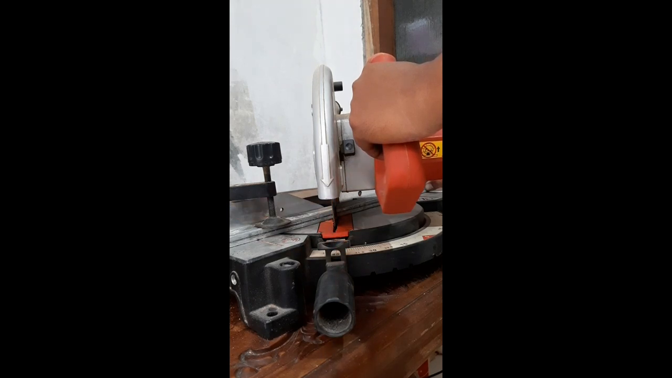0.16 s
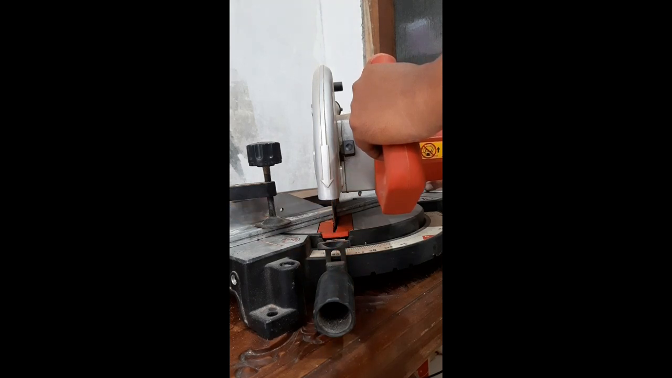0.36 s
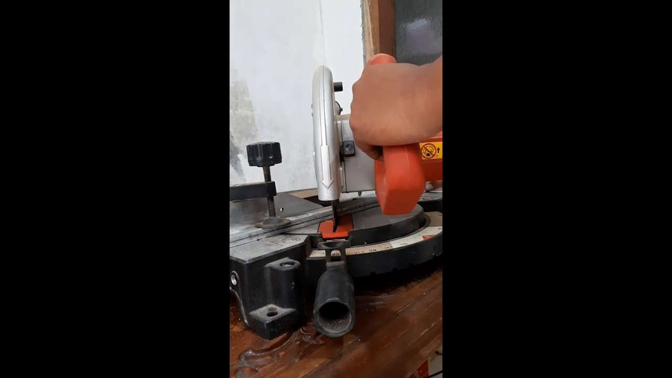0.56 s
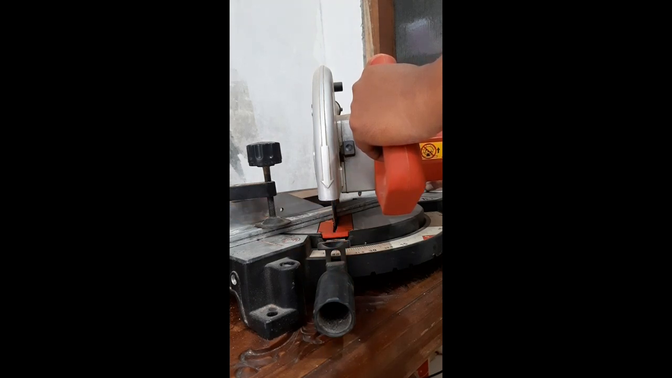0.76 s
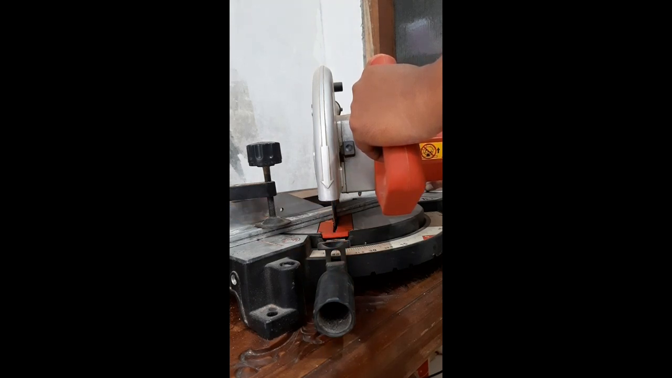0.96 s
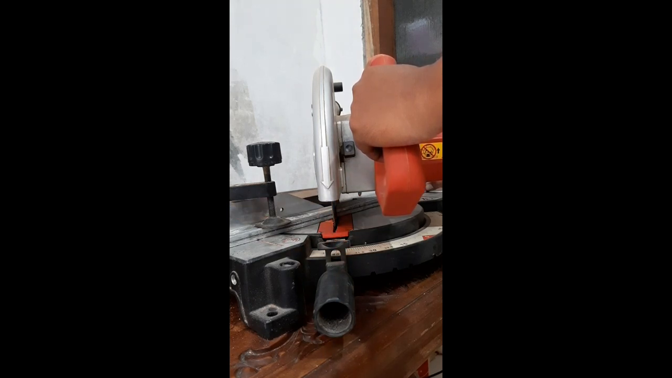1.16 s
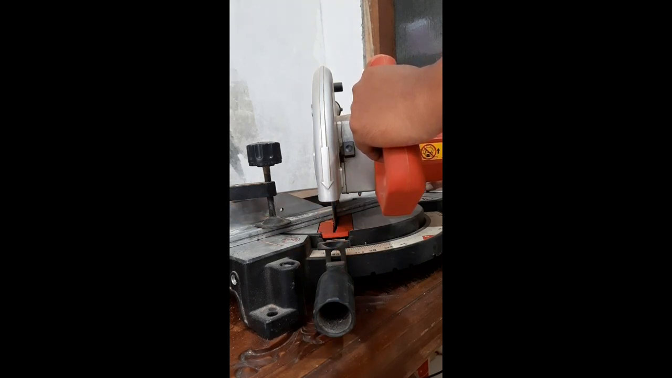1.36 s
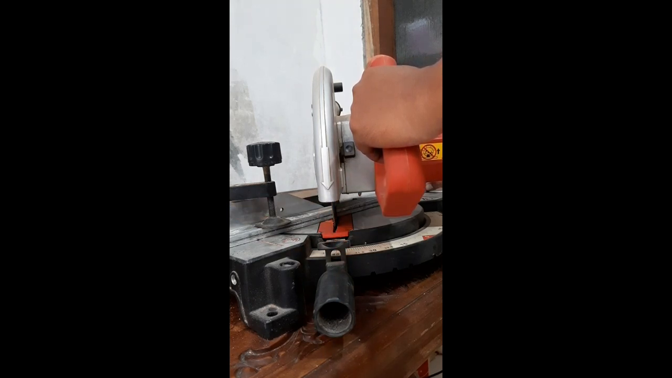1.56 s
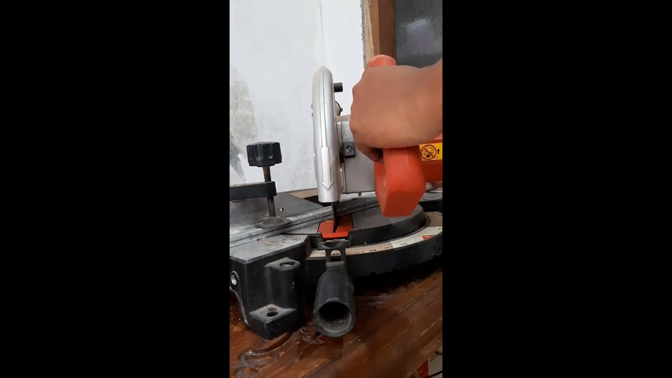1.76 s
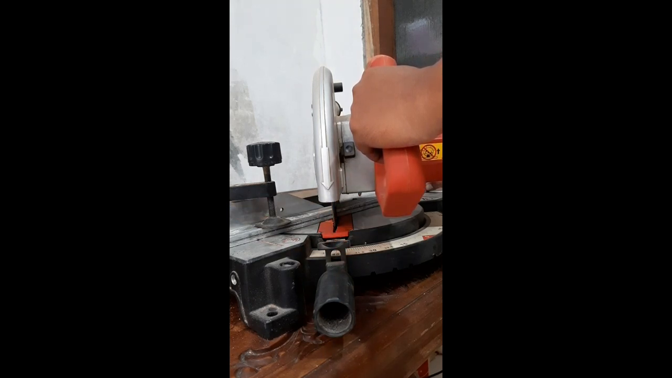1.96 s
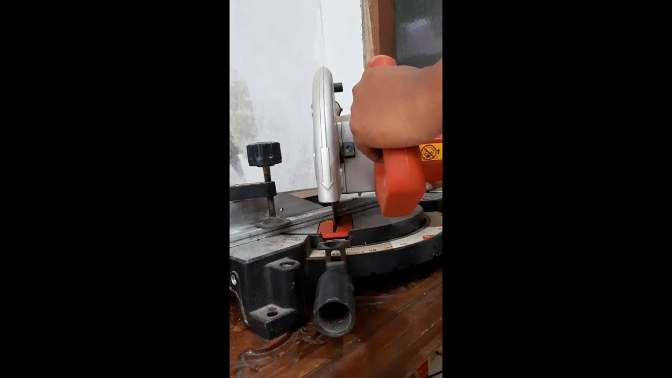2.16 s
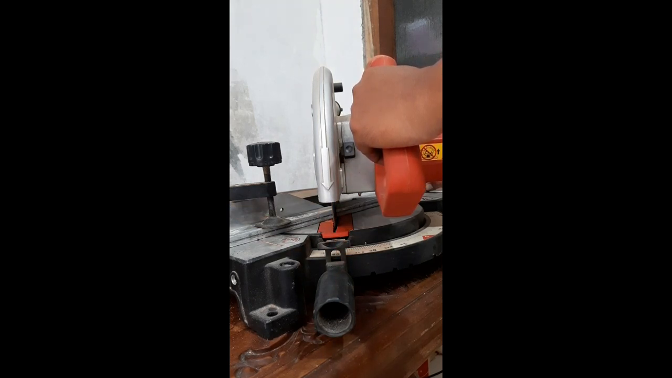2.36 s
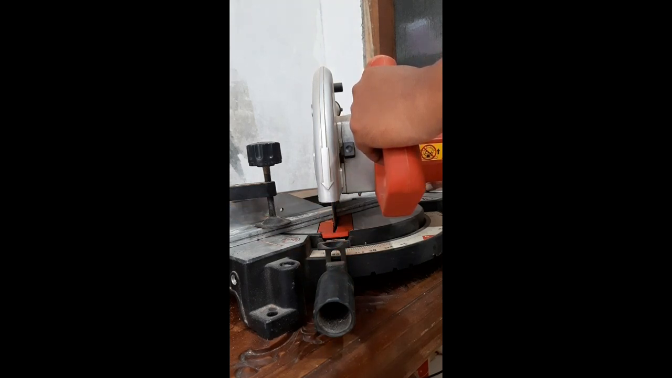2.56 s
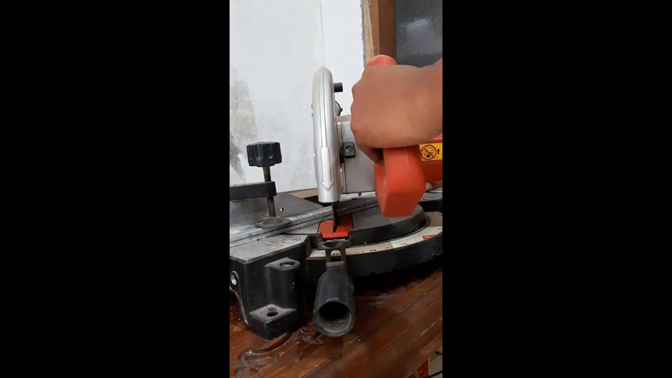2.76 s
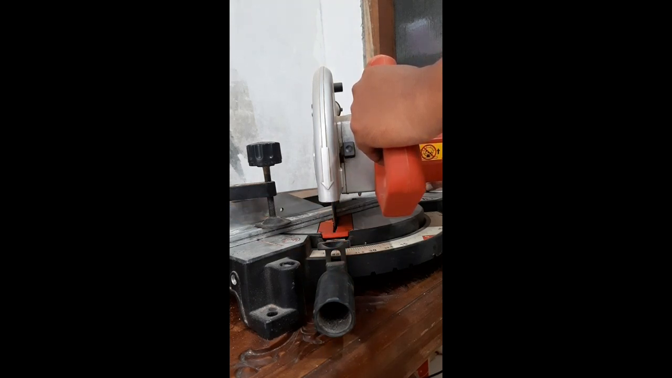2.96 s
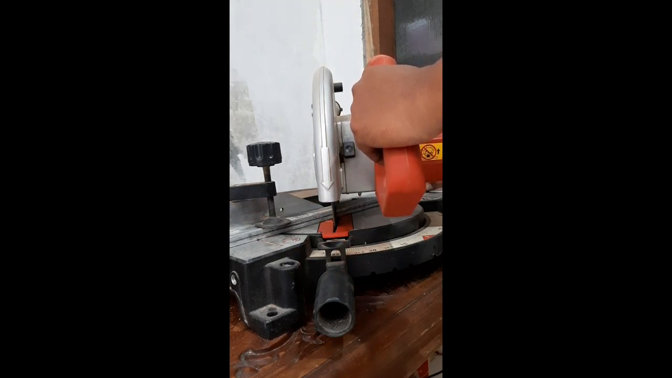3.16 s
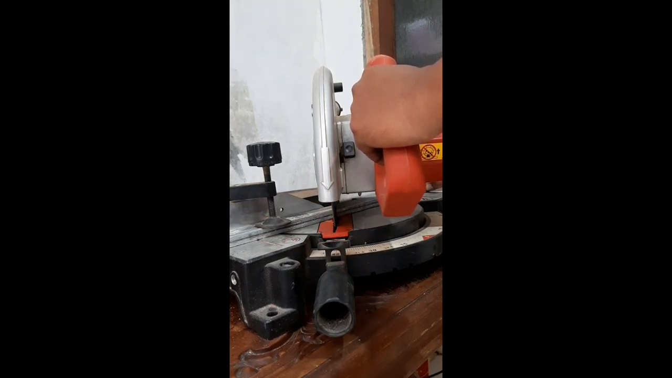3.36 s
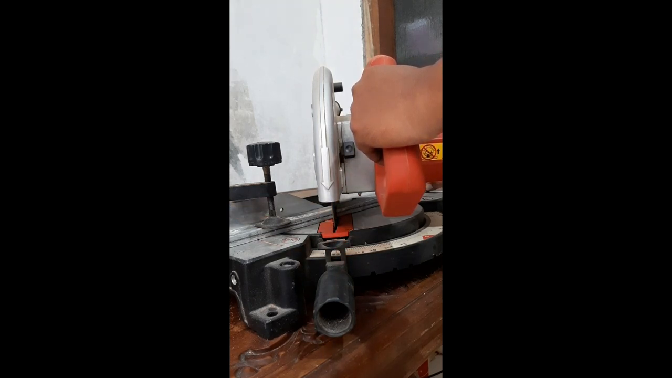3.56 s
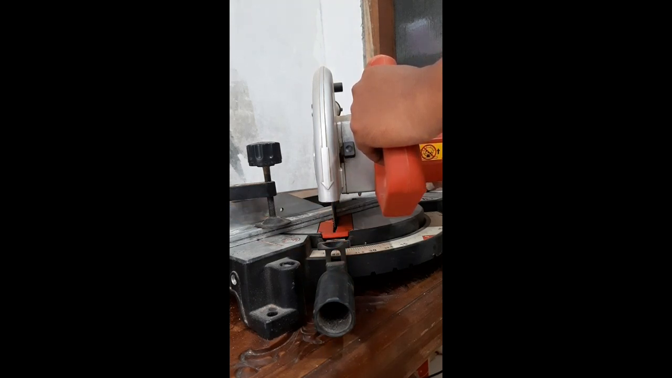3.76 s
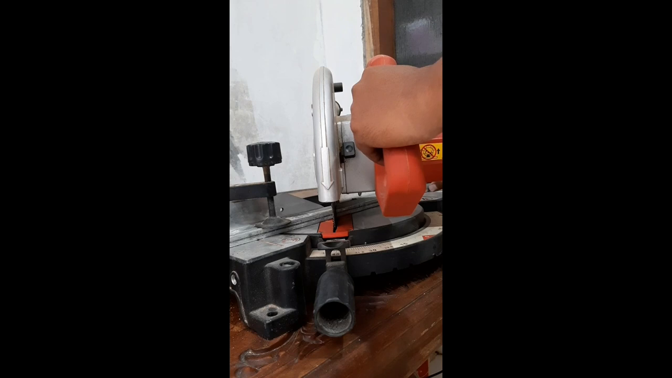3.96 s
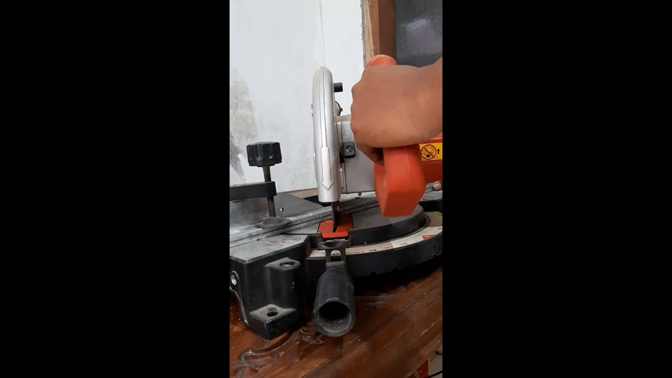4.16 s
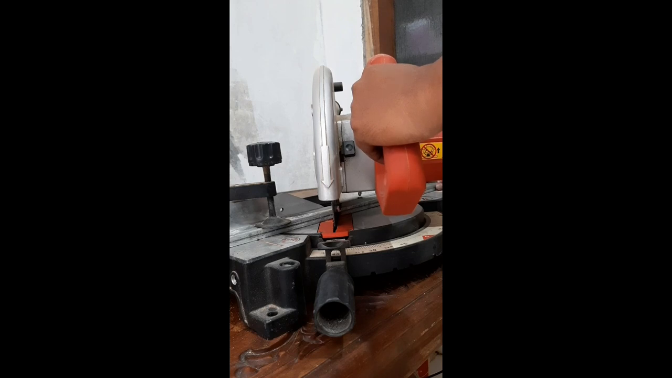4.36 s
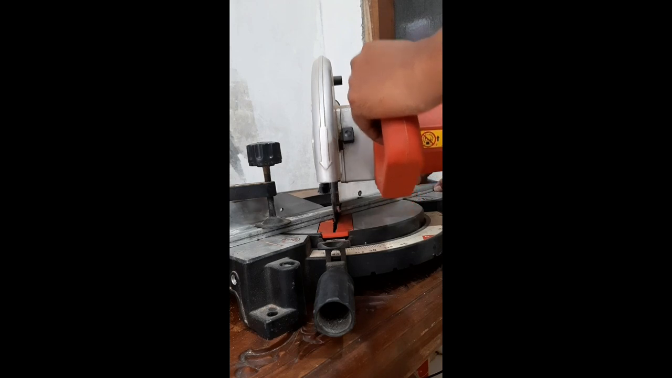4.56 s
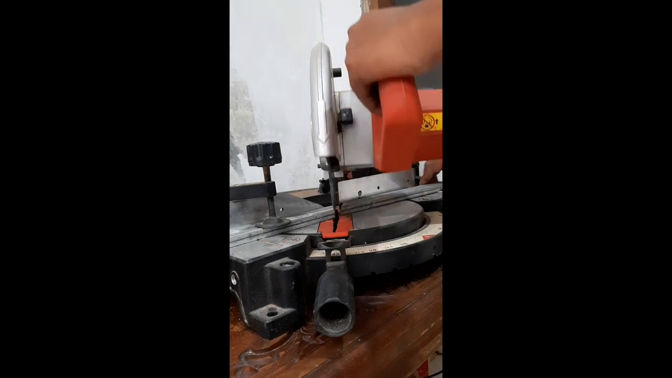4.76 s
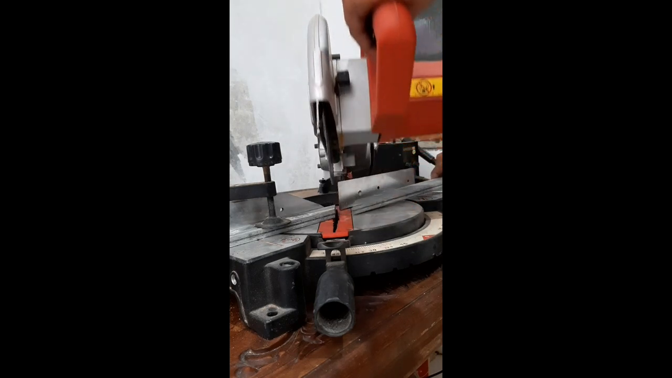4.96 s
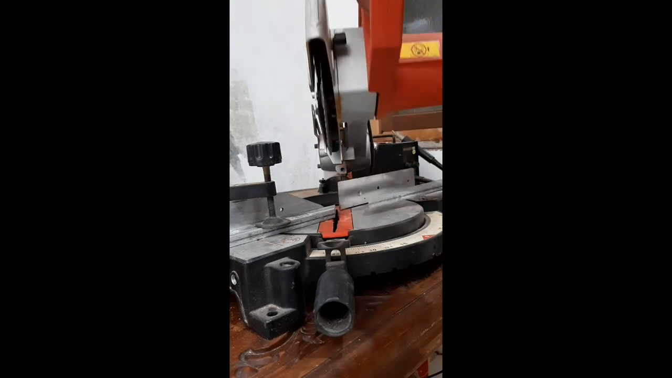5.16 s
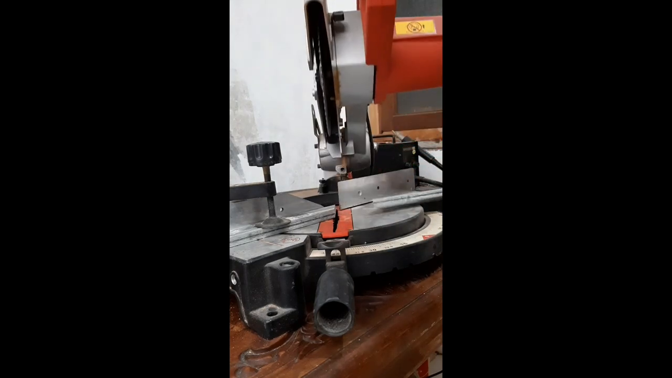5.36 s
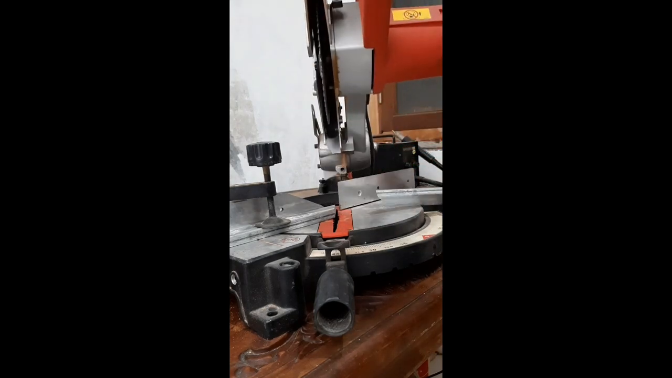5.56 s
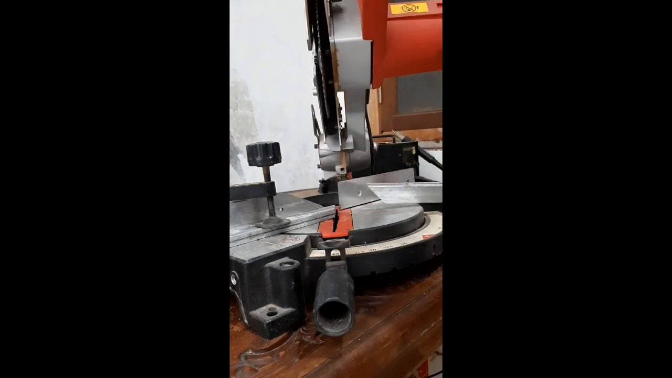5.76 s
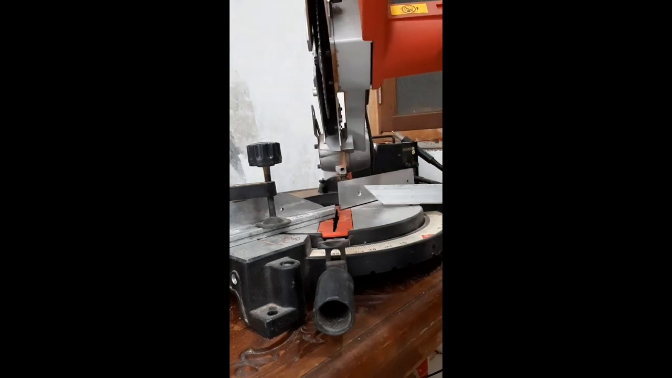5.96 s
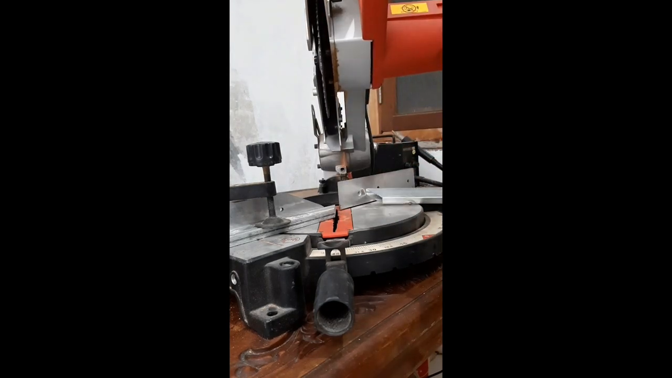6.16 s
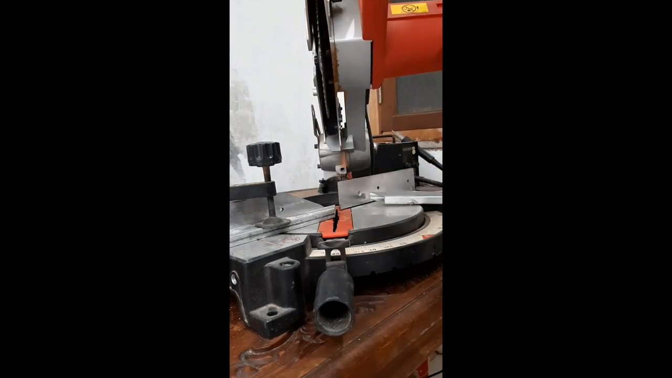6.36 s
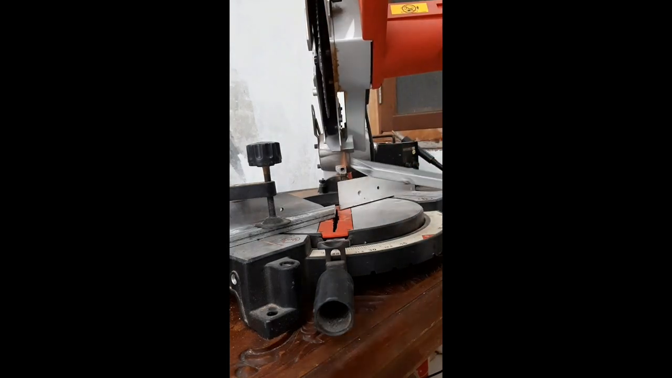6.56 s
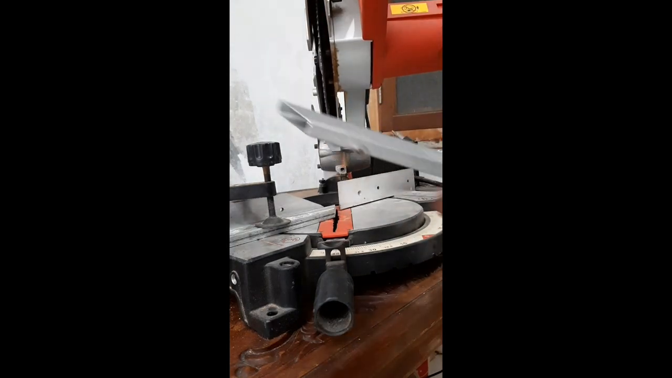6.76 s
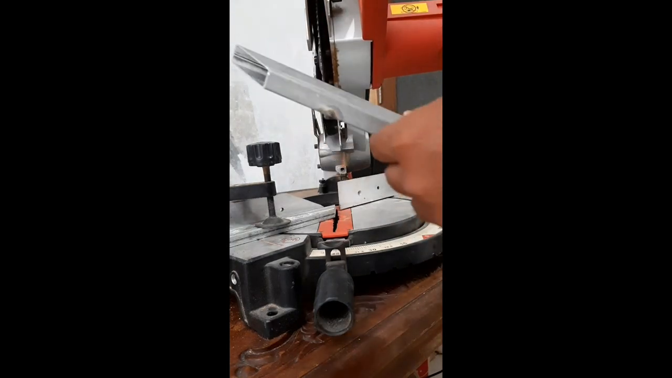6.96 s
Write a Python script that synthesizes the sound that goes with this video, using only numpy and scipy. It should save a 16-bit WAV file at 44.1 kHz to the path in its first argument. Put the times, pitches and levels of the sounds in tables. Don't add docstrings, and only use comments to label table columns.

```python
import sys
import numpy as np
from scipy import signal
from scipy.io import wavfile
from scipy.ndimage import uniform_filter1d

SR = 44100
rng = np.random.default_rng(int(sys.argv[2]) if len(sys.argv) > 2 else 0)


def wav_out(sig):
    wavfile.write(sys.argv[1], SR, np.round(np.clip(np.atleast_2d(sig).T, -1, 1) * 32767).astype(np.int16))


def invert_db(x):
    u = np.asarray(x, float) / 20
    return 10 ** u


N = 309582
T = np.arange(N) / SR
BINS = np.fft.rfftfreq(1024, 1 / SR)
STOP_S = 3.585


def evened(x):
    return x / np.sqrt(np.mean(np.abs(x) ** 2) + 1e-20)


def drifting(x, first, second):
    return evened(uniform_filter1d(uniform_filter1d(x, size=first), size=second))


def read(points, hz):
    f, value = np.transpose(points)
    return np.interp(np.log(hz + 1), np.log(f + 1), value)


# [pitch_hz, likeness]
LIKENESS = [(60, 0.25), (350, 0.81), (1700, 0.39), (3800, 0.61), (5200, 0.099), (7300, 0.24), (8300, 0.18),
            (9500, 0.3), (15000, 0.2207)]
# [pitch_hz, lead_radians]
PORT_LEAD = [(300, -.1), (1700, -.25), (3800, -1.5), (5200, .6), (7500, -.1), (8500, .2), (9500, -1.5),
             (15000, -2.2)]


def noise(colour, patchy_db, flicker_db, like=0.94, size=N):
    frames = size // 256 + 5
    a, b, c, d, patches = rng.standard_normal((frames, 513, 5)).T
    patches = evened(uniform_filter1d(uniform_filter1d(patches, size=6, axis=0), size=5, axis=1))
    flicker = evened(uniform_filter1d(rng.standard_normal(frames), size=3))
    same = np.clip(like * read(LIKENESS, BINS), -.99, .99)[:, None]
    left = a + 1j * b
    turn = np.exp(1j * read(PORT_LEAD, BINS))[:, None]
    right = same * turn * left + np.sqrt(1 - same ** 2) * (c + 1j * d)
    z = np.array([left, right])
    z *= invert_db(read(colour, BINS)[:, None] + patchy_db * patches + flicker_db * flicker)
    return evened(signal.istft(z, nperseg=1024, noverlap=768)[1][:, :size])


def whistle(hz, width, drive, like, swell_db):
    pole = np.exp(-16 * np.pi * np.maximum(width, 1) / SR)
    parts = rng.standard_normal((N // 16 + 1, 5)).T
    swell = drifting(parts[4], 200, 120)
    kicks = (parts[:2] + 1j * parts[2:4]) * drive[::16] * invert_db(swell_db * swell)
    slow = signal.lfilter([np.sqrt(1 - pole ** 2)], [1, -pole], kicks)
    turn = np.exp(1j * read(PORT_LEAD, np.max(hz)))
    slow[1] = like * slow[0] * turn + np.sqrt(1 - like ** 2) * slow[1]
    smooth = np.array([np.interp(np.arange(N) / 16, np.arange(len(s)), s) for s in slow])
    smooth = uniform_filter1d(smooth.real, size=16) + 1j * uniform_filter1d(smooth.imag, size=16)
    return (smooth * np.exp(2j * np.pi * np.cumsum(hz * np.ones(N)) / SR)).real


def stroke(start, length, db, rise, fall_db_per_s):
    fall_db = fall_db_per_s * np.maximum(T - start - length, 0)
    return np.clip((T - start) / rise, 0, 1) * invert_db(db - fall_db)


def speed():
    brake_s, takes_s, creep = 2.52, 0.32, 0.018
    return creep + (1 - creep) * np.exp(-(np.maximum(T - brake_s, 0) / takes_s) ** 2)


# [start_s, level_db, half_length_s]
WOBBLE = [(2.827, -0.5, 0.012), (3.016, -2, 0.041), (3.027, 0.5, 0.014), (3.16, -4, 0.027),
          (3.182, 3.5, 0.0047), (3.214, -1.5, 0.018), (3.243, 1.5, .006), (3.283, -4, 0.046),
          (3.352, 4, 0.019), (3.402, 0, 0.047), (3.512, -9.5, 0.1)]


def teeth_bite(spin, feed_db, last_push_s):
    slack_db = 16.5 * np.maximum(T - last_push_s, 0) + 61 * np.maximum(T - STOP_S, 0)
    wobble_db = sum(db * np.maximum(1 - abs(T - s) / half, 0) for s, db, half in WOBBLE)
    grain_s = 0.0059
    grain = evened(uniform_filter1d(rng.standard_normal(N), size=round(grain_s * SR)))
    return invert_db(feed_db - slack_db + wobble_db + (1.5 - spin) * grain)


# [pitch_hz, level_db per Hz]
HISS = [(880, -41.5), (1500, -10), (2000, -3), (3890, -0.5), (5090, -4), (5830, -8), (6500, -4),
        (7630, -9.5), (8270, -13.5), (9020, -14), (10000, -15.5), (13000, -39.5), (22000, -120)]
RUMBLE = [(18, -78), (30, -66), (98, -63.5), (287, -14.5), (431, -10.5), (473, -10), (1070, 5), (1330, 5),
          (1490, 5), (2500, -15.5), (3250, -29.5), (5500, -120)]
FIZZ = [(6000, -23), (8600, -5), (9100, -6), (10300, -1), (12200, 0), (13600, -3), (15350, -1.5),
        (15700, -53.5)]
# [pitch_hz, level_db per Hz]
SCRAPE = [(300, -57), (1000, -20.5), (2550, -10), (2900, -6), (3150, -13), (4700, -8.5), (6150, -17),
          (6600, -11.5), (7230, -16), (8000, -21.5), (11500, -13), (12250, -18.5), (14900, -18),
          (15400, -57)]


def chips(spin, rumble, fizz):
    tearing = invert_db(-3.0) * noise(HISS, 1.8, 0.79) + fizz * noise(FIZZ, 1.3, 1.1)
    scraping = invert_db(1.5) * noise(SCRAPE, 3.5, 0.65)
    return np.sqrt(spin) * tearing + np.sqrt(1 - spin) * scraping + rumble * noise(RUMBLE, 1.0, 0.86)


# [full_speed_hz, rest_hz]
DISC_HZ = [(8350, 7900), (8290, 7750), (8560, 8150), (7990, 7560), (7157, 6600), (7030, 6520), (6265, 5990),
           (6120, 5720), (5522, 5290), (4993, 4730), (4628, 4460), (4462, 4200), (4275, 4000), (4001, 3700),
           (3467, 3340), (3230, 3100), (9530, 8750), (10400, 10000), (11800, 11200), (12257, 11700),
           (12450, 12600), (13280, 12800)]
# [width_hz, full_speed_db, rest_db]
DISC = [(39.8, -5, -18), (55, 0.5, 2.5), (49.9, -11.5, -6), (40.2, -14.5, -27), (50, -8, -16.5),
        (45, -19.5, -21), (24.9, -10.5, -16), (24.93, -10, -11.5), (59.65, -11, -5), (70, -9, -5),
        (22.4, -18, -24), (15.92, -13, -25.5), (60, -19.5, -26.5), (30.03, -11.5, -9),
        (15.85, -18.5, -22.5), (30.1, -9.5, -13.5), (100, -9, -4), (200.3, -9, -12.5), (90, -23, -29),
        (38.25, -16.5, -20.5), (50, -11, -15.5), (19.95, -17.5, -31.5)]
FAINT_HZ = [3885, 4535, 5125, 5290, 5435, 5860, 6650, 7270, 7365, 8500, 8850, 9080, 9340, 9870]
FAINT_DB = [-22.5, -19.5, -22, -20.5, -19, -29, -18, -21.5, -15.5, -12, -23, -21.5, -20, -24]


def disc_waves(spin, drive):
    fits_db = (0.92 + 1.7 * (1 - spin))[::16]
    fade_db = 2 * np.maximum(T - STOP_S, 0) / 1000
    out = np.zeros((2, N))
    for (fast, rest), (width, fast_db, rest_db) in zip(DISC_HZ, DISC):
        level_db = rest_db + (fast_db - rest_db) * spin - fade_db * rest
        out += whistle(rest + (fast - rest) * spin, width, drive * invert_db(level_db), 0.38, fits_db)
    sink = .945
    for hz, db in zip(FAINT_HZ, FAINT_DB):
        level_db = db - 12 * (1 - spin)
        out += whistle(hz * (sink + (1 - sink) * spin), 14, drive * invert_db(level_db), 0.35, 2.2)
    return out


FRAME_HZ = [1100, 1460, 1550, 1850, 2100, 2290, 2830]
# [width_hz, full_speed_db, rest_db]
FRAME = [(43.7, -9.5, -10.5), (80, -8, -8), (45, -6, -3), (45.45, -10.5, -3), (27, -18.5, -13.5),
         (35.2, -18, -6), (70, -6, 0.5)]


def frame_hum(spin, drive):
    out = np.zeros((2, N))
    for hz, (width, fast_db, rest_db) in zip(FRAME_HZ, FRAME):
        out += whistle(hz, width, drive * invert_db(rest_db + (fast_db - rest_db) * spin), 0.42, 1.8)
    return out


# [full_speed_hz, rest_hz, width_hz, full_speed_db, rest_db]
GAPS = [(2600, 2540, 80, -1, -18), (3150, 3140, 90, -2, -18), (6470, 6220, 120, -7, -18),
        (7600, 7260, 120, 0, -16), (8980, 8430, 80, -1, -8), (12900, 12200, 130, -1, -12),
        (13650, 13100, 150, -5, -12), (5900, 5550, 60, -5, -6), (4150, 4150, 60, 0, -8)]


def hollowed(x):
    hz, t, z = signal.stft(x, SR, nperseg=1024)
    spin = np.interp(t, T, speed())
    dip_db = 0
    for fast, rest, width, fast_db, rest_db in GAPS:
        off = (hz[:, None] - rest - (fast - rest) * spin) / width
        dip_db = dip_db + (rest_db + (fast_db - rest_db) * spin) * np.exp(-off ** 2)
    return signal.istft(z * invert_db(dip_db), SR, nperseg=1024)[1][:, :N]


# [start_s, bite_db]
FEED = [(0.0, -16.5), (0.16, -16.5), (0.22, -17.5), (0.36, -17.5), (0.44, -16.5), (0.57, -16), (0.75, -16),
        (0.95, -17.5), (1.1, -18.5), (1.4, -17.5), (1.74, -17), (1.87, -16), (2.45, -16.5), (2.59, -15)]
# [full_speed_db, rest_db, extra_db per dB of push, gain_db as the teeth ease off]
VOICES = [
    (-10, -23.5, -1.9, 18),
    (-6, 3, 1, -7.5),
    (-9.5, -4, 2.37, -3),
    (-13, -8.5, 1.05, 6),
]


def saw():
    spin = speed()
    feed_s, feed_db = np.transpose(FEED)
    push = np.interp(T, feed_s, feed_db)
    bite = teeth_bite(spin, push, feed_s[-1])
    push_db = (push + 17.5) * spin
    eased = np.clip((T - 3.02) / 0.88, 0, 1)
    rumble, fizz, disc, frame = (
        invert_db(rest_db + (fast_db - rest_db) * spin + follow * push_db + ease_db * eased)
        for fast_db, rest_db, follow, ease_db in VOICES)
    torn = bite * chips(spin, rumble, fizz)
    return hollowed(torn + disc_waves(spin, bite * disc) + frame_hum(spin, bite * frame))


# [settled_hz, start_below_hz, murmur_db]
NOTES = [
    (3826, 118, -38),
    (4003, 3, -46),
    (5720, 0, -75),
    (4993, 0, -75),
    (5524, 0, -75),
]
# [start_s, length_s, level_db]
SPELLS = [
    [(.01, .05, -36), (.09, 0.25, -31.5), (.47, 0.11, -40.5), (.6, 0.34, -30.5), (.99, 0.13, -35),
     (1.28, 0.18, -38), (1.65, 0.057, -42.5), (2.2, 0.074, -42.5)],
    [(.33, .12, -40), (.5, 0.092, -34), (1.82, 0.1, -34), (2.14, 0.13, -29.5), (2.33, 0.19, -33)],
    [(3.014, 0.085, -31)],
    [(.0, .07, -32), (.11, 0.034, -28.5), (.31, 0.11, -34.5), (.6, .08, -34.5), (1.08, 0.24, -37),
     (1.9, 0.19, -39), (2.46, 0.074, -28)],
    [(.05, 0.1, -26), (.38, 0.096, -28), (.57, 0.11, -36), (.82, 0.13, -33), (2.08, .06, -38.5),
     (2.5, .07, -37.5)],
]


def sung_notes():
    out = np.zeros((2, N))
    for (settled, below, murmur_db), spells in zip(NOTES, SPELLS):
        wander = rng.standard_normal((N, 2)).T
        drift, flutter = (drifting(v, round(.03 * SR), 500) for v in wander)
        hz = settled - below * np.exp(-T / .6) + 12 * drift * (below + 20) / 140
        note = np.sin(2 * np.pi * np.cumsum(hz) / SR + [[0], [-1.2]])
        rough = whistle(hz, 25.0, np.ones(N), 0.64, 0.1039)
        level = invert_db(murmur_db) * speed() ** 2 * (T < STOP_S)
        level = level + sum(stroke(*row, rise=0.025, fall_db_per_s=300) for row in spells)
        out += level * invert_db(1.6 * flutter) * (2.13 * note + 0.53 * rough)
    return out


# [start_s, rise_s, level_db]
GUSTS = [
    (.415, 0.02, -47.5),
    (.55, 0.016, -51),
    (1.44, .02, -59),
    (2.35, .04, -45.5),
    (2.46, 0.1, -40.5),
    (2.6, .05, -46),
    (2.72, 0.038, -48),
    (2.82, 0.026, -53.5),
]


def draught():
    gusts = sum(stroke(s, rise, db, rise, 249) for s, rise, db in GUSTS)
    buffeting = noise([(20, -3.0), (60, -9.5), (110, -0.5), (200, -3.5), (400, -25.5)], 2.0, 2.3)
    return (invert_db(-67.5) * speed() + gusts) * buffeting


# [pitch_hz, level_db per Hz]
AIR = [(15, -29.5), (25, 1.5), (49, -13), (123, -5), (384, -14), (591, -9), (818, -20.5), (1130, 2),
       (2050, -4), (2690, -2.5), (3430, -8.5), (14800, -27), (16000, -40.5)]
# [pitch_hz, level_db]
FAR_HUM = [(107.7, -70.5)]


def room_air():
    bass_back = np.clip((T - 4.2) / 0.36, .3, 1)
    hum = sum(whistle(hz, 9.8, invert_db(db) * bass_back, 0.6, 2.0) for hz, db in FAR_HUM)
    duck_db = -9 * np.clip(1 - (T - STOP_S) / 0.96, 0, 1)
    return invert_db(duck_db) * (invert_db(-60.5) * noise(AIR, 2.2, 0.31, like=.5) + hum)


RING_OUT_HZ = [1104, 1858, 2288, 2623, 2950, 3667, 4656, 5080, 5650]
# [level_db, t60_s]
RING_OUT = [(-46.5, 1.07), (-48.5, 1.55), (-46, 0.85), (-58, 5), (-47, 0.81), (-49, 1.33), (-48.5, 1.07),
            (-50, 1.15), (-48, 1.06)]


def ring_out():
    t = T - STOP_S
    swell = np.clip(t / 0.64 + 1, 0, 1)
    out = np.zeros((2, N))
    for hz, (db, t60) in zip(RING_OUT_HZ, RING_OUT):
        mode = np.sin(2 * np.pi * hz * t + [[0], [-.6]])
        twin = 0.24 * np.sin(2 * np.pi * (hz + 7) * t)
        out += swell * invert_db(db - 60 * np.maximum(t, 0) / t60) * (mode + twin)
    return out


# [pitch_hz, level_db per Hz]
BRIGHT = [(880, -39), (1500, 2), (1870, -4), (2250, -6), (2910, -4), (11300, -10), (14600, -10.5),
          (16000, -9.5)]
# [start_s, level_db]
TICKS = [
    (5.929, -51),
    (6.248, -56),
    (6.288, -54),
    (4.84, -57),
    (3.186, -20),
    (3.6, -22),
]


def ticks():
    t60_s = 0.0083
    snaps = sum(stroke(s, .001, db, 0.00033, 60 / t60_s) for s, db in TICKS)
    return snaps * noise(BRIGHT, 1.0, 0.5, like=1.4)


# [pitch_hz, level_db per Hz]
DULL = [(180, -21), (300, -7), (422, -15), (760, -1.5), (1860, -17), (2300, -12), (2500, -15), (5000, -25),
        (6500, -53), (11000, -120)]
THUD = [(20, -26), (60, -12.5), (110, -5), (200, -0.5), (400, -33)]
EDGE = [(590, -32), (1000, -5.5), (1150, -17), (1220, -7), (3420, -1), (4070, -7), (14100, -16.5),
        (16000, -26)]
LATCH = [(350, -18), (600, -4), (850, -20), (1200, -3), (1600, -6.5), (2100, -15.5), (3400, -14.5),
         (6000, -33.5)]
# [start_s, length_s, dull_rub_db, bright_rub_db, low_bump_db]
STROKES = [
    (4.244, 0.81, -71.5, -69.5, -78),
    (4.952, 0.32, -82, -52.5, -68.5),
    (5.391, 0.58, -72, -65, -67.5),
    (5.881, .38, -52, -73.5, -59.5),
    (6.254, 0.22, -43.5, -51, -56),
    (6.604, .5, -54, -71, -56.5),
]
# [start_s, length_s, level_db]
SLIDES = [
    (6.394, .02, -41.5),
    (6.877, .04, -50),
    (6.956, .1, -43),
]
# [start_s, length_s, level_db]
CHATTER = [
    (4.287, 0.06, -49.5),
    (4.751, .05, -58),
    (4.811, .06, -60),
    (5.017, 0.072, -62.5),
    (5.6, 0.071, -53),
]


def handling():
    dull, bright, low = sum(stroke(s, length, np.array(db)[:, None], 0.41, 56.5) for s, length, *db in STROKES)
    rub = dull * noise(DULL, 3.9, 3.5) + bright * noise(BRIGHT, 2.5, 0.83, like=0.392)
    bumps = low * noise(THUD, 1.5, 0.69)
    slide = sum(stroke(*row, rise=.013, fall_db_per_s=606) for row in SLIDES)
    chatter = sum(stroke(*row, rise=.04, fall_db_per_s=122) for row in CHATTER)
    return rub + bumps + chatter * noise(LATCH, 3.0, 4.9, like=1.4) + slide * noise(EDGE, 2.8, 1.5)


# [start_s, peak_db, body_hz, puff_minus_body_db, jingle_minus_body_db]
CLICKS = [(4.268, -42, 1140, -32.5, -45), (4.295, -46, 1200, -22, -40), (4.308, -46, 1150, -24, -40),
          (4.321, -41, 1230, -27, -36), (4.328, -38, 1140, -26, -39.5), (4.340, -39, 1250, -22, -34.5),
          (4.355, -41, 1000, -24, -39), (4.388, -45, 600, -22, -40), (4.369, -47.5, 2060, -16.5, -32),
          (4.404, -52, 1290, -9, -36), (4.736, -27.5, 1262, -35, -45), (4.769, -44.5, 703, -23, -32),
          (4.826, -46, 2810, -12.5, -31), (4.838, -37, 1140, -22, -34), (4.905, -46, 2920, -15, -29),
          (5.04, -41, 1450, -25, -40), (4.925, -38, 1330, -23, -21.5), (5.011, -51, 4800, -32, -30),
          (5.071, -41, 1500, -19, -22), (5.087, -37.5, 1310, -22, -22.5), (5.629, -40, 1210, -22, -40),
          (5.658, -40, 1150, -23, -40), (5.89, -51, 500, -24, -44), (6.049, -33.5, 1560, -23.5, -35),
          (6.094, -34, 1230, -27, -44), (6.32, -32, 867, -26, -44), (6.356, -40, 805, -28.5, -43),
          (6.384, -39.5, 890, -26, -44), (6.2, -35.5, 930, -27.5, -42), (6.485, -34, 1360, -26, -40),
          (6.512, -31.5, 1000, -14, -26), (6.548, -35.5, 1300, -21, -23), (6.575, -32, 1410, -24.5, -40),
          (6.605, -34.5, 800, -25, -34), (6.64, -44, 1100, -25, -39.5), (6.997, -37, 3290, -4.5, -25)]
# [pitch_hz, level_db, t60_s]
SPRING = [(2930, 3, .1), (3450, -3, 0.11), (4050, 2, .1), (4450, 1, .1), (4800, 1.5, 0.15), (7600, -3, .1)]


def clicks():
    out, t = np.zeros((2, N + SR)), np.arange(8000) / SR
    for s, db, hz, puff_db, jingle_db in CLICKS:
        colour = [(0.18 * hz, -30), (0.61 * hz, -14), (hz, 0), (1.1 * hz, -14), (3 * hz, -40)]
        body = 0.35 * noise(colour, 2.0, 0.8, like=3.6, size=8000) + 0.38 * np.sin(2 * np.pi * hz * t)
        puff = invert_db(puff_db + 6.0) * noise(BRIGHT, 2.2, 1.2, like=1.4, size=8000)
        jingle = 0
        for mode_hz, mode_db, mode_t60 in SPRING:
            level_db = mode_db + 1.5 * rng.standard_normal() - 60 * t / mode_t60
            jingle = jingle + invert_db(level_db) * np.sin(2 * np.pi * mode_hz * t)
        touch = (body + puff) * invert_db(-60 * t / .06) + invert_db(jingle_db) * jingle
        at = round(s * SR)
        out[:, at:at + 8000] += invert_db(db) * touch * np.minimum(t / .002, 1)
    return out[:, :N]


def beating_pair(hz, t):
    split_hz, turn, lead = rng.uniform([8, 0, -.6], [20, 1, .6])
    twin = np.sin(2 * np.pi * ((hz + split_hz) * t + turn) + [[lead], [0]]) * invert_db(-7.0 - 5.5 * t)
    return np.sin(2 * np.pi * hz * t + [[0], [lead]]) + twin


# [start_s, peak_db, crack_t60_s, rattle_db, rattle_t60_s]
KNOCKS = [
    (5.506, -11, 0.051, -10, 0.32),
    (6.008, -12, 0.092, -7, 0.75),
    (6.412, -6, 0.056, -15, 0.69),
]
# [pitch_hz, level_db per Hz]
CLATTER = [
    [(180, -75), (300, -58.5), (1170, -5.5), (3290, -6), (3580, -8), (3830, 2), (4230, -11), (4910, -3.5),
     (14000, -22.5), (16000, -60)],
    [(200, -46), (900, -28), (1200, -3.5), (1600, -2), (2200, 3), (2700, -16.5), (4300, -6.5), (5400, -23),
     (11000, -30.5), (16000, -61.5)],
    [(200, -33), (1010, 0), (2000, -4), (2900, -13), (4600, -5.5), (6700, -29), (8000, -45), (10000, -31),
     (16000, -92)],
]
# [pitch_hz, level_db per Hz]
BOOM = [(88, -39), (150, -11), (611, -1.5), (1340, 7), (2670, -35), (2910, -12), (3060, -21.5), (3390, -21),
        (9000, -25.5), (11700, -64), (19800, -120)]
RING_HZ = [770, 880, 1030, 1200, 1362, 2080, 2444, 2853, 3098, 3284, 3350, 3542, 3772, 3994, 4250, 4460,
           4657, 4785, 5130, 5733, 6072, 6514, 7461, 7757, 8330, 9652]
# [t60_s, first_knock_db, second_knock_db, third_knock_db]
RINGS = [(0.45, -23, -12, -8), (0.25, -35.5, -16, -8), (0.32, -42, -8.5, 1), (0.31, -8.5, -14, -10),
         (0.087, -43, -20, 5), (0.048, -28, 2, -28), (0.69, -35, -21, -16.5), (0.95, -4, -23, -6.5),
         (0.15, -3.5, -6.5, -36), (0.59, -33, -8.5, -38), (0.42, 2, -10, -6), (0.15, -23, -12, -17),
         (0.56, 6.5, -13, -18), (0.3, -26, -18, -24), (0.43, -31.5, -13, -21), (0.37, -2, -30, -34),
         (0.27, -18, -21, -32.5), (0.59, -2.5, -28, -18), (0.42, -1, -38, -35), (0.28, -21, -40, -30),
         (0.55, -11.5, -32, -25), (0.26, -12, -27, -24), (0.53, -23, -36, -44), (0.36, -5, -28, -31),
         (0.23, -11, -39, -50.5), (0.15, -10, -48, -46)]
# [free_s, lost_db, ring_length_factor]
SETTLE = [
    (0.018, -10, 0.99),
    (0.017, -4, 0.86),
    (0.035, -2.5, 0.53),
]


def knocks():
    clatter, ring, t = np.zeros((2, N + SR)), np.zeros((2, N + SR)), np.arange(SR) / SR
    for k, (s, db, t60, rattle_db, rattle_t60) in enumerate(KNOCKS):
        at = round(s * SR)
        free_s, lost_db, ring_factor = SETTLE[k]
        rise = invert_db(db - 13.0) * np.minimum(t / 0.0016, 1)
        damped = rise * invert_db(2.5 + lost_db * np.clip((t - free_s) / 0.00728, 0, 1))
        crack_fall = invert_db(-60 * t / t60) + 0.8 * invert_db(-60 * t / 0.027)
        crack = noise(CLATTER[k], 1.5, 0.37, like=1.38, size=SR) * crack_fall
        rattle = noise(BOOM, 1.8, 4.6, size=SR) * invert_db(rattle_db - 60 * t / rattle_t60)
        clatter[:, at:at + SR] += damped * crack + rise * rattle
        for hz, (mode_t60, *mode_db) in zip(RING_HZ, RINGS):
            pair = beating_pair(hz, t)
            rock = drifting(rng.standard_normal(SR), round(0.02 * SR), 400)
            rock_db = 2.6 * rock * np.minimum(t / 0.066, 1)
            fall_db = 60 * t / (mode_t60 * ring_factor)
            ring[:, at:at + SR] += damped * invert_db(rock_db - 3 + mode_db[k] - fall_db) * pair
    return clatter[:, :N], ring[:, :N]


# [pitch_hz, t60_s]
SHOP = [(200, 0.37), (1000, 0.68), (4000, 0.6), (7000, 0.38), (12000, 0.74)]


def shop(x):
    taps = np.zeros((2, SR))
    at = np.arange(200, SR - 20, 20) + rng.integers(0, 20, (2, (SR - 201) // 20))
    np.put_along_axis(taps, at, rng.choice([-1., 1.], at.shape), 1)
    hz, t, z = signal.stft(taps, SR, nperseg=256)
    tail = signal.istft(z * invert_db(-60 * t / read(SHOP, hz)[:, None]), SR, nperseg=256)[1]
    return signal.fftconvolve(x, tail / np.linalg.norm(tail[0]), axes=1)[:, :N]


def scene():
    cutting = saw() + sung_notes() + ring_out()
    clatter, ring = knocks()
    blows = clatter + clicks() + ticks()
    walls = invert_db(-2.5) * shop(blows + 0.5 * ring)
    balance = invert_db([[.2], [-.2]])
    return balance * (cutting + draught() + handling() + room_air() + ring + blows + walls)


def top_cut(x):
    return signal.sosfilt(signal.butter(12, 16340, fs=SR, output="sos"), x)


def record(dry):
    bass_cut = signal.butter(2, 42, "high", fs=SR, output="sos")
    thin = signal.sosfilt(bass_cut, np.clip(dry, -.95, .95))
    band_limit = signal.firwin(255, 15450, window=("kaiser", 8), fs=SR)
    mix = signal.oaconvolve(thin, band_limit[None], "same")
    return top_cut(mix)


dry = scene()
out = record(dry)
wav_out(out)
```